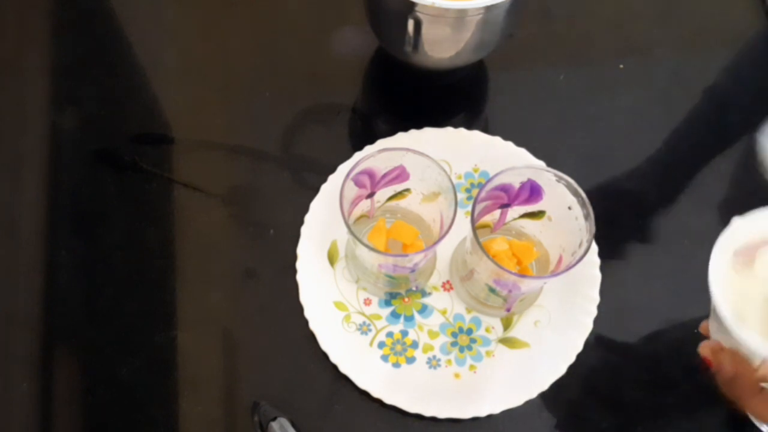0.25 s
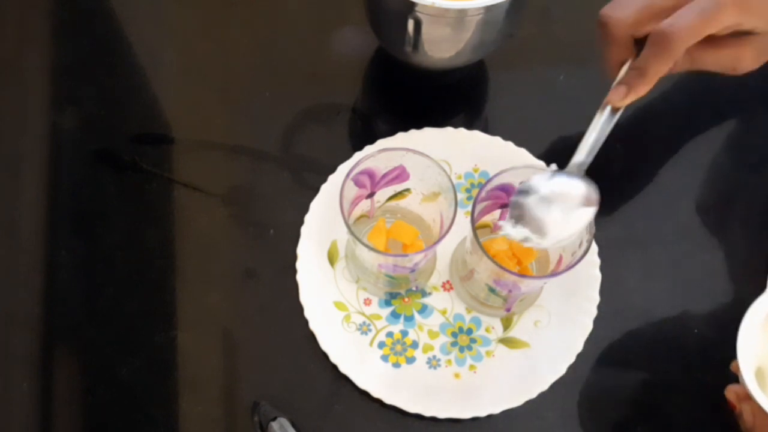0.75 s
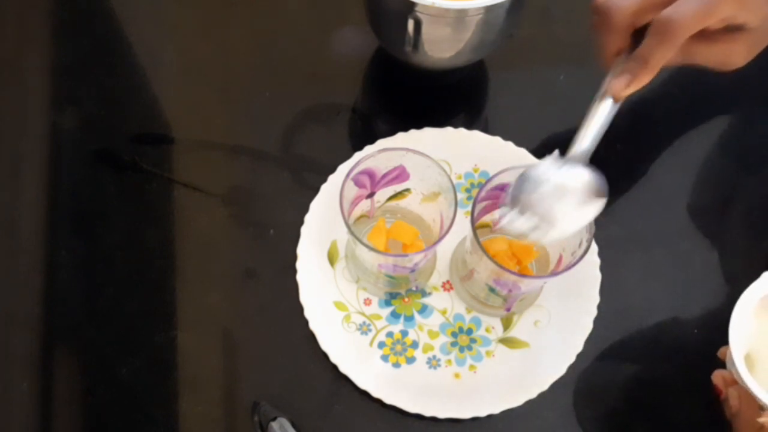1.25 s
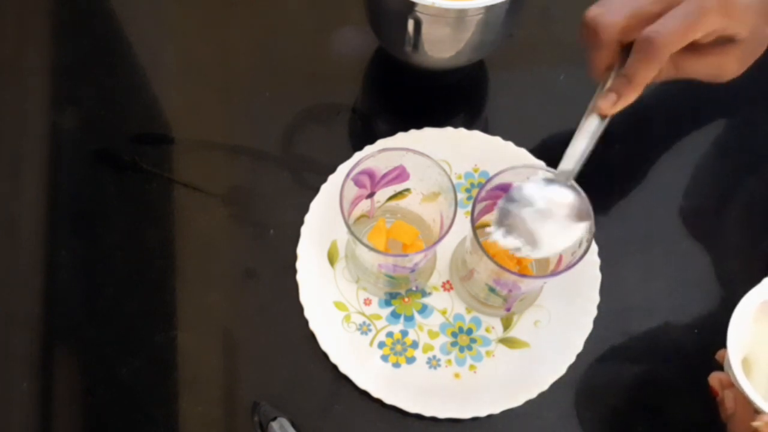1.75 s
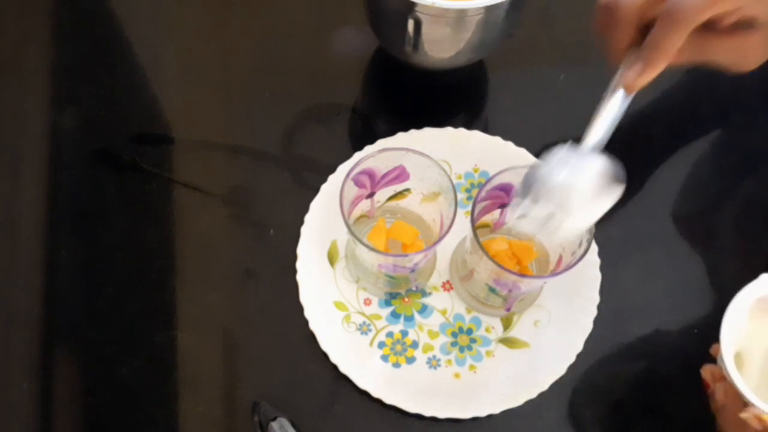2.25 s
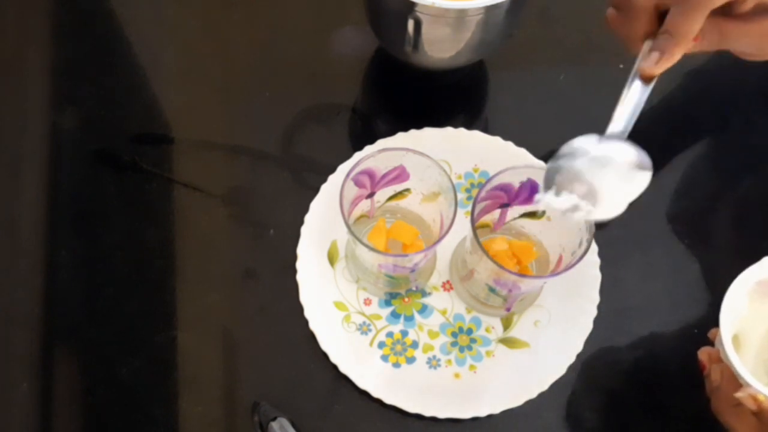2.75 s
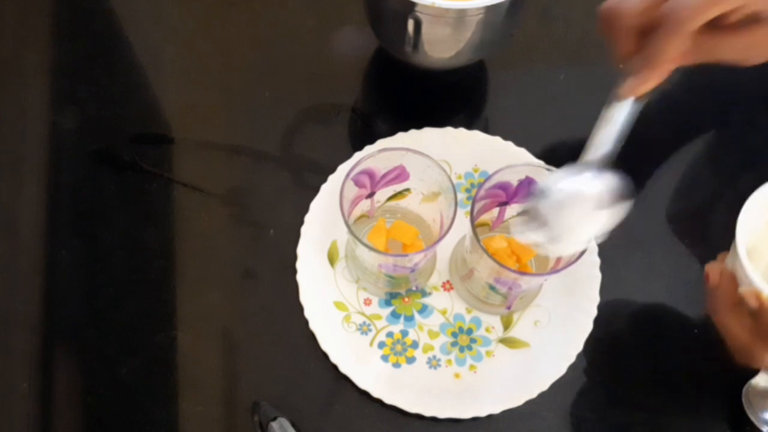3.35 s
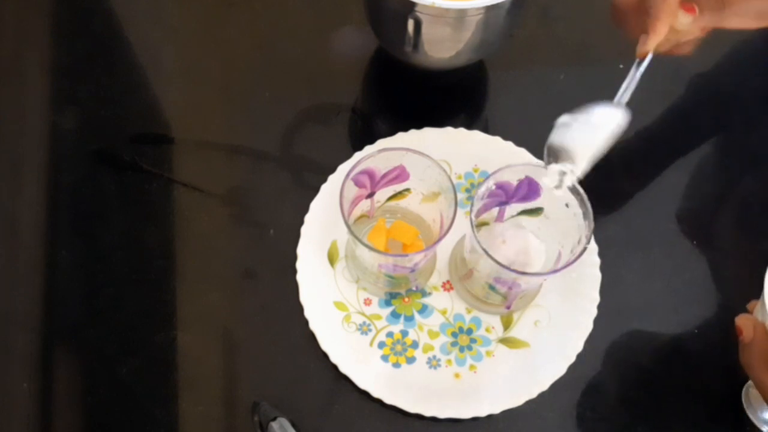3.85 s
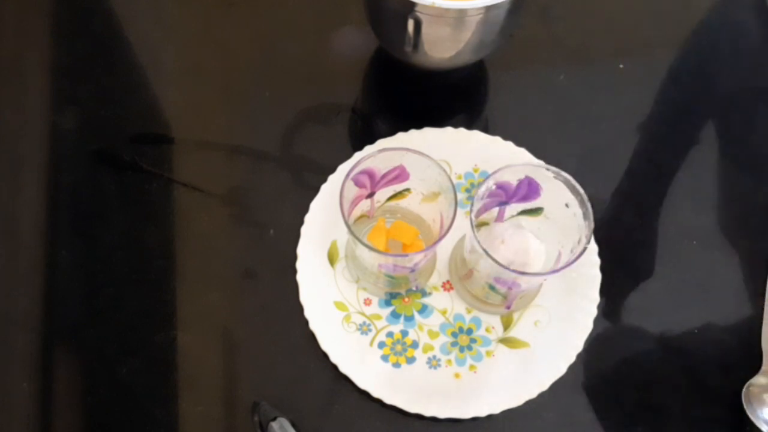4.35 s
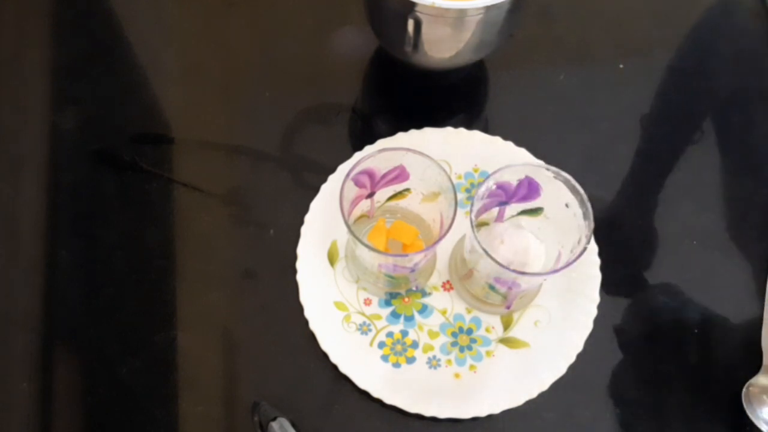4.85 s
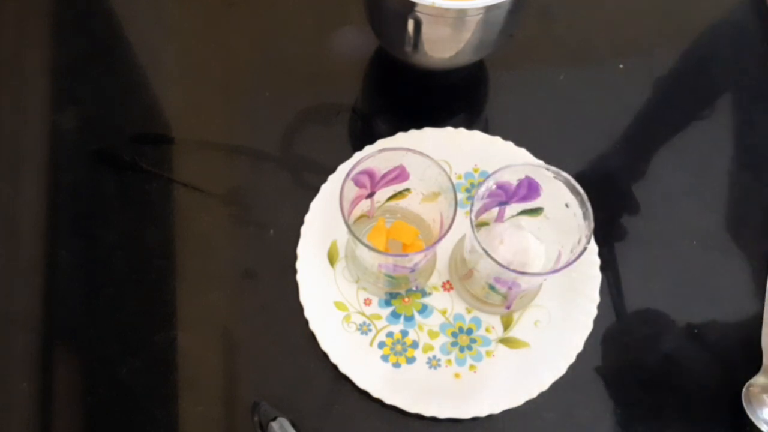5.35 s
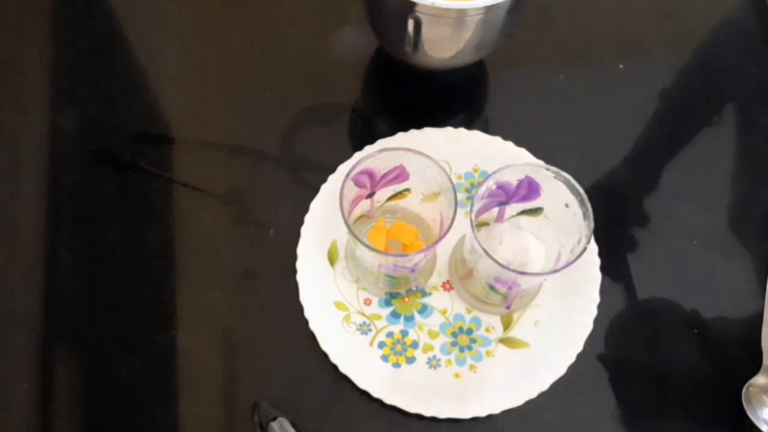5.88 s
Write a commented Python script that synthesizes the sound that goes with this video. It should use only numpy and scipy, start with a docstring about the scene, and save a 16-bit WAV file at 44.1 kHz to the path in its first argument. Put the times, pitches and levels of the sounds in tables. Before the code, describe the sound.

A spoon clinks twice on a drinking glass, then knocks softly and scrapes in a plastic tub, over a quiet kitchen's fridge hum.

```python
"""A fridge hum, room noise and a brief scrape open a small hard-walled kitchen; a far bird peeps outside.
Close to the microphone, a spoon knocks twice on a drinking glass on a plate, glancing, then square on.
Each blow cracks and sets the glass ringing in pairs of modes that beat against each other.
Later things are set down with dull soft knocks, and the spoon scrapes and ticks in a plastic tub.
The microphone is a phone's two ports, which hear the room alike in the bass and unrelated in the treble."""
import sys
import numpy as np
from scipy import signal
from scipy.fft import rfft, irfft
from scipy.io import wavfile
from scipy.ndimage import uniform_filter1d

SR = 44100
rng = np.random.default_rng(int(sys.argv[2]) if len(sys.argv) > 2 else 0)


def store_wav(level_fs):
    """Save 16-bit WAV to argv[1]."""
    pcm = np.round(np.clip(np.atleast_2d(level_fs), -1, 1) * 32767)
    wavfile.write(sys.argv[1], SR, pcm.T.astype(np.int16))


N = 269847

# spoon on glass: t/s, crack level/dB, crack tilt/(dB per octave), thud of the foot/dB, glancing/(0-1)
GLASS_BLOWS = [(0.8649, -24.5, -0.6, -2, 0.91), (2.8490, -14.5, -0.02, 13, 0)]
# pairs of modes of the glass: f/Hz, partner higher by/Hz, t60/s
GLASS_MODES = [(762.5, 11, .7), (1810, 7.4, .56), (1824, 18, .6), (2822.9, 10.6, .6), (4937, 24.4, .43),
               (6187, 38, .42), (6472, 40, .3), (7549, 11, .42), (7781.5, 14, .33), (10290, 20, .27),
               (11200, 11, .33), (11900, 30, .3), (12870, 14, .24)]
# the same pairs at the microphone: mode level/dB, partner level/dB, loss of each to a glancing blow/dB,
# first lull of the throb/s, left minus right of each/dB
MODE_LEVELS = [(-44, -42, 25, 17, 0.022, 1.5, -28.5), (-30, -25, 2.4, .6, .16, -11, 5.5),
               (-36, -34.5, 24, 18, .02, 14.5, -3), (-36, -25, 1.8, 16.3, 0.027, -8.5, -1),
               (-36, -36.5, 26, 25, .028, -2.5, -8), (-42.5, -46, 1.3, 4, 0.0079, -11.5, -9.5),
               (-37.5, -32.5, 3, 7.5, 0.0091, 3, -13), (-43.5, -42.5, 0.5, .1, .04, 2.1, 6.5),
               (-35, -30, 9, 21, 0.054, -12, -7.5), (-41.5, -45, 8.4, 10.1, 0.023, 2.5, -4.5),
               (-42.5, -44, 9, 10.1, .04, 5, 2), (-45.5, -50.5, 14, 12, .01, 1.5, 3),
               (-44, -45.5, 15, 12, .03, -2.5, -1.5)]
# crack of spoon, plate and counter together: f/Hz, density/dB
CRACK_COLOUR = [(60, -30.5), (160, -15), (300, -15), (980, -16.5), (1720, -5.5), (2400, -14), (3600, -22.5),
                (5400, -29.5), (6320, -17), (7000, -23), (7700, -17.5), (8800, -40), (11000, -25.5),
                (16000, -32.5)]
# damped resonances of the spoon: f/Hz, width/Hz, boost/dB
SPOON_PEAKS = [(4110, 100, 6), (6200, 90, 9), (6490, 120, 8), (7570, 90, 8), (7790, 90, 8),
               (10340, 300, 12), (11220, 240, 10), (12120, 300, 12), (12900, 240, 12), (13700, 600, 7),
               (15400, 400, 10)]
# dull soft knocks of things set down or dropped, then bright spoon ticks in the tub:
# t/s, level/dB, low edge/Hz, centre/Hz
KNOCKS_AND_TICKS = [(3.485, -46.5, 1260, 1680), (3.595, -50, 704, 1380), (3.6200, -43.5, 805, 1010),
                    (3.673, -56, 1400, 1780), (4.095, -65, 600, 1300), (5.172, -30, 380, 3900),
                    (5.179, -41, 1300, 1750), (5.678, -48, 3050, 4380), (5.9672, -30, 380, 3800)]
# damped resonances that colour those knocks and ticks: f/Hz, width/Hz, boost/dB
KNOCK_PEAKS = [(720, 360, 7.7), (1625, 62, 11.3), (3690, 690, 7.2), (5800, 1300, 3.2), (11200, 2000, 6.7)]
# spoon dragged through the tub: t/s, length/s, level biting in/dB, level at the end/dB
SCRAPE_STROKES = [(-.03, 0.05, -62, -55.5), (3.386, 0.076, -69, -67), (4.706, 0.093, -57, -61),
                  (4.783, 0.23, -62.5, -58), (5.072, 0.1, -66, -59), (5.774, 0.19, -55.5, -57.5)]
# hiss of steel on plastic: f/Hz, density/dB
SCRAPE_HISS = [(500, -9.5), (1300, -1), (2500, -9.5), (3400, -3.5), (4300, -8), (6000, -10.5),
               (9000, -14.5), (16000, -20)]
# fridge tones: f/Hz, level/dB, waver/dB, waver rate/Hz, pitch spread/Hz
FRIDGE_TONES = [(100, -66, 2.5, 7, 1), (195, -64, 3, 9, 4), (301, -63, 3, 8, 2), (399, -58.5, 3, 6, 1.5),
                (485, -70, 3, 6, 3), (797, -74, 3, 10, 8), (1357, -68, 1.5, 20, 4), (2087, -80, 1.5, 20, 3),
                (2184, -71, 1.5, 20, 3)]
# spells of the low drone: t/s, length/s, level/dB
DRONE_SPELLS = [(0.166, 1.97, -65), (2.5, 1.13, -58.5), (4.12, 1.56, -58)]
# room noise: f/Hz, density/dB
AIR_COLOUR = [(25, -24), (59, -13), (87, -14), (157, -9), (200, -4), (263, -8), (400, -8.5), (800, -12.5),
              (1400, -20), (2160, -21.5), (3500, -31), (7000, -37.5), (12500, -45), (16000, -42.5)]
# slow swell of the room noise: t/s, gain/dB
AIR_DRIFT = [(0, 1.5), (1.4, 1.5), (3.3, 0.9), (3.75, -0.5), (4.2, 1.5), (5, 2), (5.6, 1.7), (6.12, 1)]
# decay of the kitchen's echo: f/Hz, t60/s
KITCHEN_T60 = [(100, 1), (250, 0.84), (1000, 0.47), (4000, 0.54), (8000, 0.46), (16000, .36)]
# the room at the two microphone ports: f/Hz, left-right likeness/(0-1)
PORT_LIKENESS = [(60, 1), (130, 0.95), (290, 0.92), (640, 0.54), (1400, 0.2), (3100, .05), (6800, 0.015)]

FOOT_HZ, FOOT_WIDTH_HZ = 750, 350  # the glass thuds on the plate
TICK_CYCLES = 101  # t60 in periods of the centre
TICK_FALL_DB, TICK_FALL_DB_PER_KHZ = 34, -7.5  # first octave above the centre: steep for dull knocks
BITE_S, LIFT_T60_S = 0.039, 0.12
PEEP_S, PEEP_LENGTH_S, PEEP_DB, PEEP_HZ, PEEP_SAG_HZ = .645, 0.21, -61, 3600, 160.6
PEEP_ATTACK_S, PEEP_SAG_S, PEEP_DB_PER_S = 0.016, 0.0406, -53
DRONE_HZ, DRONE_FADE_S, DRONE_WAVER_DB = 92.2, 0.13, 2
AIR_DB = -54
LEFT_DB, LEFT_LAG_S = -2.5, .00025  # the left port hears the place softer and later
TOP_HZ = 15900  # upper limit of the microphone


def glass_ring():
    """Close up: each blow starts every mode and its slightly detuned partner, so the ring throbs."""
    out, t = np.zeros((2, N)), np.arange(SR) / SR
    port_phase = np.array([[1.3], [0]])  # the rim flexes in lobes, so the ports hear it out of step
    rise = np.clip(t / 0.00083, 0, 1)
    for start, *_, glancing in GLASS_BLOWS:
        for (hz, split_hz, t60), levels in zip(GLASS_MODES, MODE_LEVELS):
            db, partner_db, loss_db, partner_loss_db, lull_s, pan_db, partner_pan_db = levels
            phase = 2 * np.pi * hz * t + port_phase
            beat = 2 * np.pi * split_hz * (t - lull_s)
            mode = undb(db - loss_db * glancing) * sides(pan_db) * np.sin(phase)
            partner_gain = undb(partner_db - partner_loss_db * glancing) * sides(partner_pan_db)
            partner = partner_gain * np.sin(phase + beat)
            add(out, start, (mode - partner) * fade(t, t60) * rise)
    return out


def glass_cracks():
    """The hard contact: a sharp first tick, then glass foot and plate chatter for some ms and settle."""
    out, t = np.zeros((2, N)), np.arange(8192) / SR
    rise = np.clip(t / .0005, 0, 1)
    chatter = 1 / (1 + (t / 0.015) ** 4)
    envelope = (1.4 * fade(t, 0.018) + 0.45 * chatter + .2 * fade(t, 0.13)) * rise
    for start, crack_db, tilt_db, thud_db, _ in GLASS_BLOWS:
        colour = [(hz, db + tilt_db * np.log2(hz / 1000)) for hz, db in CRACK_COLOUR]
        body = body_response(colour, SPOON_PEAKS + [(FOOT_HZ, FOOT_WIDTH_HZ, thud_db)])
        add(out, start, undb(crack_db) * sides(LEFT_DB) * knock(body, envelope, echo_db=-3.0))
    return out


def knocks_and_ticks():
    """Things set down or dropped knock dully, then the spoon ticks in the tub; low bursts last longer."""
    out, t = np.zeros((2, N)), np.arange(4096) / SR
    for start, db, low_hz, hz in KNOCKS_AND_TICKS:
        fall_db = TICK_FALL_DB + TICK_FALL_DB_PER_KHZ * hz / 1000
        colour = [(low_hz / 2, -30), (low_hz, 0), (hz, 0), (2 * hz, -fall_db), (TOP_HZ, -fall_db - 8)]
        burst = knock(body_response(colour, KNOCK_PEAKS), fade(t, TICK_CYCLES / hz), echo_db=-4.5)
        add(out, start, undb(db) * sides(LEFT_DB) * burst)
    return out


def tub_scrape():
    """Slightly grainy hiss of steel on plastic: each stroke bites in, drifts in level and lifts off."""
    t, gain = np.arange(N) / SR, np.zeros(N)
    for start, length, bite_db, end_db in SCRAPE_STROKES:
        bite = np.clip((t - start) / BITE_S, 0, 1)
        press = undb(np.interp(t, [start, start + length], [bite_db, end_db]))
        lift = fade(np.maximum(t - start - length, 0), LIFT_T60_S)
        gain = np.maximum(gain, press * bite * lift)
    grain = undb(3.7 * waver(60) - 2.5)
    return gain * grain * sides(LEFT_DB) * noise(SCRAPE_HISS)


def bird_peep():
    """Outside: one faint whistle that sags in pitch and fades, blurred by distance."""
    t = np.arange(N) / SR
    age = np.maximum(t - PEEP_S, 0)
    hz = PEEP_HZ - PEEP_SAG_HZ * (1 - np.exp(-age / PEEP_SAG_S))
    blur = 1 + 0.023 * waver(220)
    tone = np.sin(2 * np.pi * np.cumsum(hz * blur) / SR)
    gain = undb(PEEP_DB + PEEP_DB_PER_S * age) * gate(t, PEEP_S, PEEP_LENGTH_S, PEEP_ATTACK_S)
    return np.tile(tone * gain, (2, 1))


def fridge_hum():
    """In the background: wavering fridge tones over a low drone that comes and goes."""
    t = np.arange(N) / SR
    spells = sum(undb(db) * gate(t, start, length, DRONE_FADE_S) for start, length, db in DRONE_SPELLS)
    drone = np.sin(2 * np.pi * DRONE_HZ * t) * spells * undb(DRONE_WAVER_DB * waver(5))
    out = np.tile(drone, (2, 1))
    for hz, db, waver_db, rate, spread_hz in FRIDGE_TONES:
        phase = 2 * np.pi * np.cumsum(hz + spread_hz * waver(rate)) / SR
        lag = np.arccos(on_log(hz, PORT_LIKENESS))  # higher tones reach the ports out of step
        out += undb(db + waver_db * waver(rate)) * np.sin([phase - lag / 2, phase + lag / 2])
    return np.sqrt(2) * sides(LEFT_DB) * out


def room_air():
    """All around the microphone: low room noise that swells a little."""
    swell_db = np.interp(np.arange(N) / SR, *np.transpose(AIR_DRIFT)) + .7 * waver(6)
    return undb(AIR_DB + swell_db) * sides(LEFT_DB) * at_ports(noise(AIR_COLOUR))


def kitchen_tail():
    """Diffuse echo off the hard walls, energy 1 a side; every half octave dies at its own pace."""
    size = SR // 2
    t, f = np.arange(size) / SR, np.fft.rfftfreq(size, 1 / SR)
    spectrum, tail = rfft(at_ports(rng.standard_normal((2, size)))), 0
    for hz in 60 * 2 ** np.arange(0, 8.5, .5):
        band = np.clip(1 - 2 * abs(np.log2(np.maximum(f, 1) / hz)), 0, 1)  # neighbours add up to one
        tail = tail + irfft(spectrum * band, size) * fade(t, on_log(hz, KITCHEN_T60))
    tail = tail * np.clip(t / 0.0051, 0, 1)  # the first walls answer after a few ms
    return tail / np.sqrt(np.sum(tail ** 2) / 2)


def at_ports(pair):
    """Two unrelated signals become left and right, alike in the bass and unrelated in the treble."""
    size = pair.shape[1]
    f = np.fft.rfftfreq(size, 1 / SR)
    alike = on_log(f, PORT_LIKENESS)
    mid, side = rfft(pair) * np.sqrt([(1 + alike) / 2, (1 - alike) / 2])
    delay = np.exp(-2j * np.pi * f * LEFT_LAG_S)
    return irfft([(mid + side) * delay, mid - side], size)


def knock(body, envelope, echo_db):
    """A rattle of the given envelope through a body's response; the walls answer its first contact."""
    rattle = at_ports(rng.standard_normal((2, len(envelope)))) * envelope
    drive = undb(echo_db) * np.sqrt(np.sum(envelope ** 2)) * kitchen_tail()
    drive[:, :len(envelope)] += rattle
    return signal.fftconvolve(drive, body[None], axes=1)


def body_response(colour, peaks, size=2048):
    """Click of a struck body, energy 1: an (f/Hz, level/dB) colour plus damped resonances."""
    f = np.fft.rfftfreq(size, 1 / SR)
    peaks_db = sum(boost_db / (1 + (2 * (f - hz) / width) ** 2) for hz, width, boost_db in peaks)
    cepstrum = irfft(np.log(undb(on_log(f, colour) + peaks_db)), size)
    cepstrum[1:size // 2] *= 2  # folded to minimum phase: nothing sounds before the contact
    cepstrum[size // 2 + 1:] = 0
    click = irfft(np.exp(rfft(cepstrum)), size)
    return click / np.sqrt(np.sum(click ** 2))


def noise(colour):
    """Two unrelated noises of rms 1 with an (f/Hz, density/dB) colour."""
    gain = undb(on_log(np.fft.rfftfreq(N, 1 / SR), colour))
    x = irfft(rfft(rng.standard_normal((2, N))) * gain, N)
    return x / np.sqrt(np.mean(x ** 2))


def waver(rate):
    """Random levels held 1 / rate s and smoothed twice; spread 1."""
    hold = int(SR / rate)
    steps = np.repeat(rng.standard_normal(N // hold + 1), hold)
    smooth = uniform_filter1d(uniform_filter1d(steps, hold), hold)[:N]
    return smooth / smooth.std()


def gate(t, start, length, ramp):
    """Gain 0-1 that opens and closes over the ramp time."""
    return np.clip(np.minimum(t - start, start + length - t) / ramp, 0, 1)


def fade(t, t60):
    """Exponential decay, 60 dB down at t60."""
    return np.exp(-np.log(1000) * t / t60)


def undb(db):
    """Decibels to gain."""
    return 10 ** (np.asarray(db) / 20)


def on_log(hz, table):
    """Read an (f/Hz, value) table on a log-frequency axis."""
    f, values = np.transpose(table)
    return np.interp(np.log(np.maximum(hz, 1)), np.log(f), values)


def sides(pan_db):
    """Port gains, left minus right = pan_db."""
    return undb(np.array([[pan_db / 2], [-pan_db / 2]]))


def add(bus, start, x):
    """Mix x into the bus from start/s."""
    i = int(start * SR)
    bus[:, i:i + x.shape[1]] += x[:, :N - i]


def scene():
    """Close sounds and the far bird, each with its share of echo, over the steady kitchen."""
    ring, bird, scrape = glass_ring(), bird_peep(), tub_scrape()
    to_walls = undb(-22) * ring + bird + scrape  # cracks, knocks and ticks carry their own echo
    echo = signal.fftconvolve(to_walls, kitchen_tail(), axes=1)[:, :N]
    return ring + glass_cracks() + knocks_and_ticks() + bird + scrape + echo + fridge_hum() + room_air()


def record(dry):
    """The phone's microphone thins the deep bass and cuts the top steeply."""
    bass_cut = signal.butter(2, 60, "high", fs=SR, output="sos")
    top_cut = signal.ellip(10, .2, 70, TOP_HZ, fs=SR, output="sos")
    return signal.sosfilt(top_cut, signal.sosfilt(bass_cut, dry))


dry = scene()
out = record(dry)
store_wav(out)
```